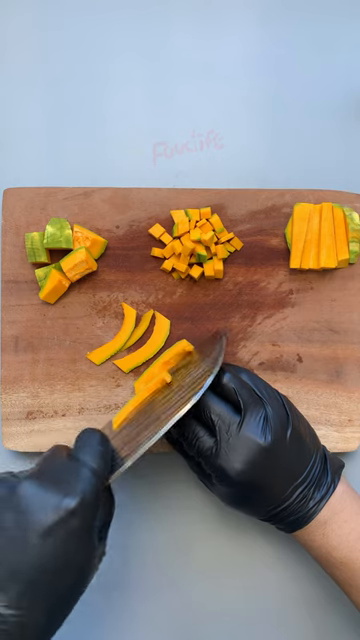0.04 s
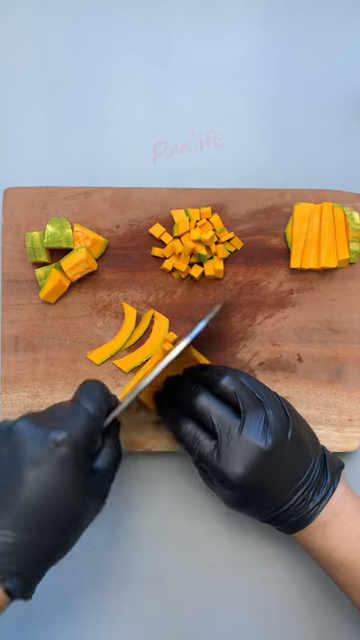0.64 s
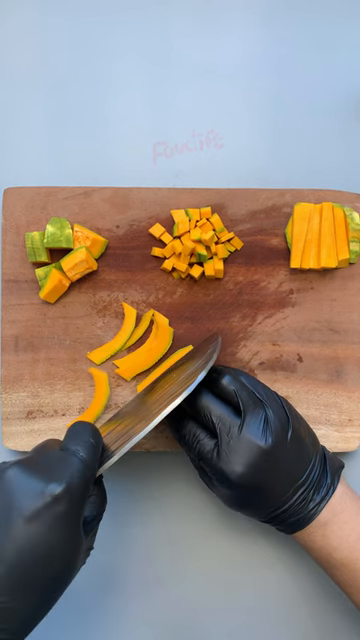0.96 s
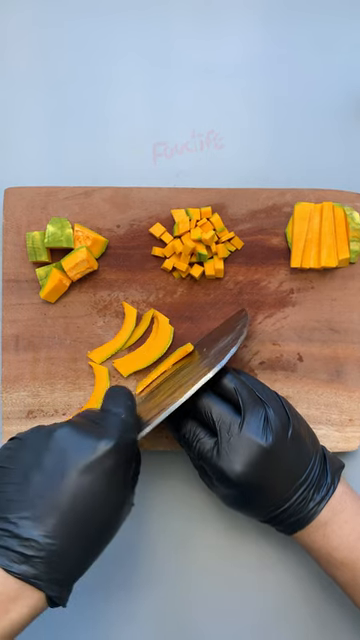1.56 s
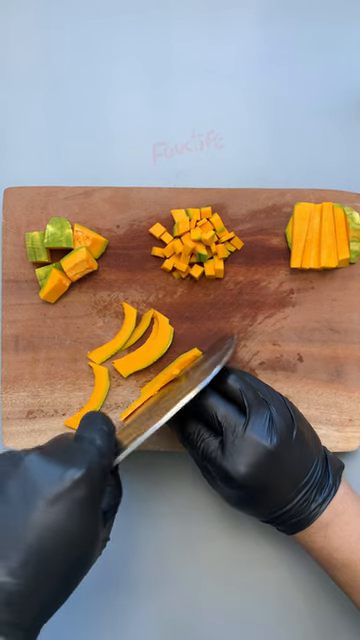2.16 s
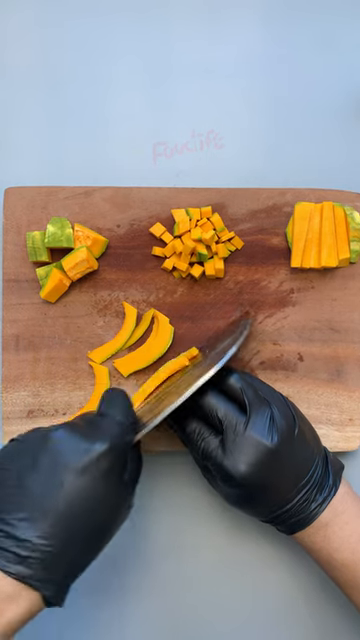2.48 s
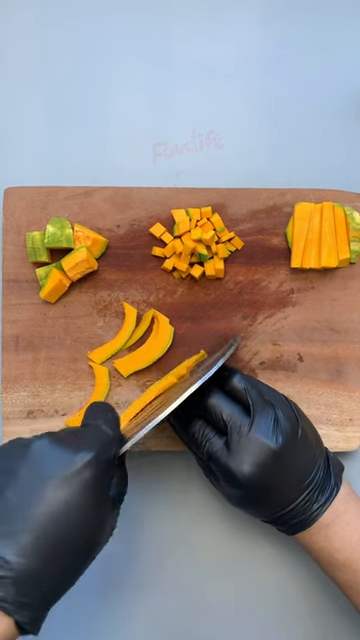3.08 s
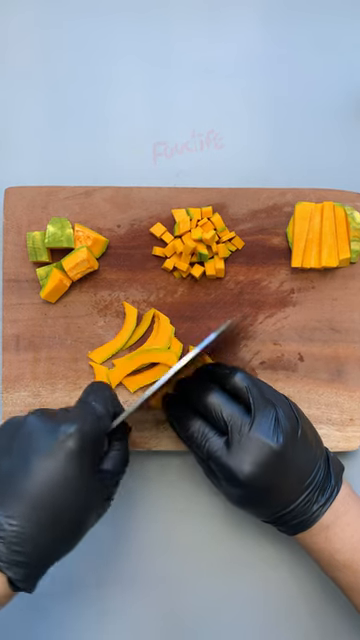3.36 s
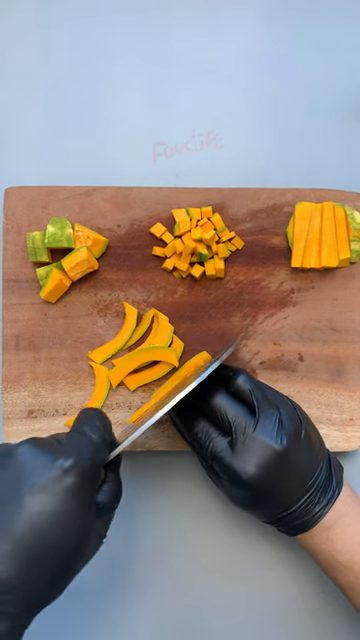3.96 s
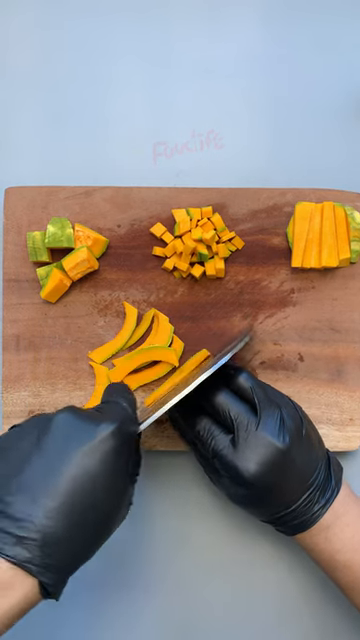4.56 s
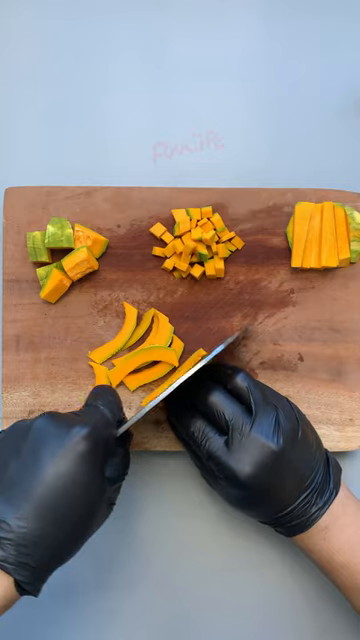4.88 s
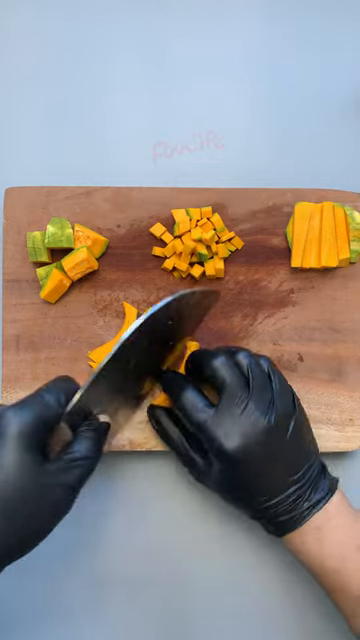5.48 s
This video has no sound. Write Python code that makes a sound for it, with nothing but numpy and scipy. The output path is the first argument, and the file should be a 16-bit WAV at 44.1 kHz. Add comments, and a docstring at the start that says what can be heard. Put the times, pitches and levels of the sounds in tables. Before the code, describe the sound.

Close by in a small kitchen, a knife cuts five slices off a firm pumpkin, about one a second. Each stroke swells into a crisp, crunchy rasp and ends in a knock on the wooden board, with a low boom from the counter. A softer, duller knock follows the last cut. In between, the blade ticks lightly and rubber gloves rub faintly over a low hum of air.

```python
"""In a small kitchen, a knife cuts five slices off a firm pumpkin on a wooden board, close by.
Each stroke pushes into the flesh, swells to a rasp of bursting cells and knocks on the board, which
makes the counter boom; then the blade is drawn along the cut. A softer knock follows the last stroke.
The blade ticks, rubber gloves rub, both squeak briefly, and the room echoes over a low hum of air."""
import sys
import numpy as np
from scipy import signal
from scipy.fft import rfft, irfft
from scipy.io import wavfile
from scipy.ndimage import uniform_filter1d

SR = 44100
rng = np.random.default_rng(int(sys.argv[2]) if len(sys.argv) > 2 else 0)


def unload_audio(sound):
    """Save the sound as a 16-bit wav file, at the path given as the first command line argument."""
    columns = np.transpose(np.atleast_2d(sound))
    # keep every value between -1 and 1, then stretch to whole-number steps
    steps = np.round(np.clip(columns, -1, 1) * 32767)
    wavfile.write(sys.argv[1], SR, steps.astype(np.int16))


N = 243873
T = np.arange(N) / SR
RING = T[:SR]  # one second of time for a struck thing to ring in

# The tones of the steel blade, damped by the hand. A ring time (t60) is the time to fade by 60 dB.
# (pitch [Hz], relative level [dB], ring time [s])
BLADE_TONES = [(1002, -4.5, 0.068), (1870, 2.5, 0.018), (2246, -4, 0.036), (2570, -6, 0.02),
               (3280, -5.5, 0.011), (3950, -11.5, 0.013)]


def slicing(crunch_db=6.0, slip_db=1.1, stop_s=0.0057):
    """Cells burst under the edge: a fine rasp, and a lower crunch from the body of the pumpkin."""
    # The blade drives down until the board stops it, then is drawn along the cut. (landing [s],
    # rasp level [dB], swell time [s], crunch share [dB], delay of the draw [s], draw level [dB])
    strokes = [(0.309, -44.5, 0.034, -8, 0.12, -61), (1.495, -43.5, 0.022, -2.5, 0.11, -66),
               (2.394, -43, .029, -4, 0.084, -63.5), (3.194, -46.5, 0.044, -4, 0.091, -65),
               (4.542, -44, 0.013, -3.5, 0.093, -62.5), (4.955, -52, 0.0061, -12, .04, -73.5)]
    # First pushes that stall before the board.
    # (peak time [s], rasp level [dB], swell time [s], fade time [s], crunch share [dB])
    pushes = [(.155, -63, 0.071, 0.12, -2.5), (1.377, -54, 0.047, 0.017, -1.5),
              (2.178, -71.5, 0.062, 0.042, -4), (2.309, -56.5, 0.035, 0.034, -1),
              (3.05, -70.5, 0.055, 0.12, 2.5)]
    # The tone colours of the rasp and the crunch. (frequency [Hz], relative level [dB])
    rasp_spectrum = [(3000, -22.5), (4400, -9), (5200, -5), (6000, 0), (7200, 2), (8500, 2.5),
                     (10000, -4.5), (12000, -4.5), (14000, -7), (15700, -14)]
    crunch_spectrum = [(300, -8.5), (750, 5), (1100, 13.5), (1450, -4.5), (1900, 5), (2300, -7),
                       (2900, -0.5), (3700, -2), (4500, -2), (6500, -18)]
    rasp = unit(colour(grains(per_s=4000, spread_db=-2), rasp_spectrum))
    crunch = undb(crunch_db) * unit(colour(grains(per_s=2600, spread_db=3.5), crunch_spectrum))
    moves = [(undb(db) * swell(at, rise_s, fall_s), share) for at, db, rise_s, fall_s, share in pushes]
    for at, db, rise_s, share, draw_s, draw_db in strokes:
        drive = undb(db) * swell(at, rise_s, stop_s, curve=1.15)
        draw = undb(draw_db) * swell(at + draw_s, rise_s=.04, fall_s=.036)
        moves += [(drive, share), (draw, -4)]  # every draw has a crunch share of -4 dB
    # overlapping moves add in power
    rasp_level = np.linalg.norm([effort for effort, _ in moves], axis=0)
    crunch_level = np.linalg.norm([effort * undb(share) for effort, share in moves], axis=0)
    stick_and_slip = undb(slip_db * wander(per_s=160))  # the fibres catch the blade and let go
    return (rasp_level * rasp + crunch_level * crunch) * stick_and_slip


def knocks(lead_in_s=.0035, settle_s=.0012, press_s=0.011):
    """Blade or hand hits the board and presses it onto the counter; a softer landing sounds duller."""
    # The blows, with relative levels. (time [s], clack [dB], boom [dB], treble cut-off [Hz],
    # clack pitch [ratio], clack length [ratio], crack [dB], boom tilt [dB per octave])
    blows = [(0.3105, -11, -4.5, 1300, 1.005, 2.47, -1.5, 0.5),
             (.436, -31.5, -32, 1510, 1.1, 1.27, -15, 1.5), (1.4983, -3, .5, 1400, 1.045, 1.38, -2, -1.5),
             (2.3953, -9, -3, 1300, 0.99, 1.3, -10, -2), (3.1944, -4.5, -1.5, 1450, 1.034, 1.63, 0.5, -1.5),
             (3.979, -46, -29.5, 200, 1, 1, -48, -4.5), (4.011, -48, -28.5, 201.5, 1.1, 1, -44, -2),
             (4.5438, -1.5, -3, 1450, 1.044, 0.97, 4, 4), (4.834, -46, -18.5, 260, 0.48, 1, -40, -0.5),
             (4.9566, -12.5, -3.5, 810, 0.83, 1.03, -28, -1)]
    # The board's short clack, and the boom of board and counter together.
    # (pitch [Hz], relative level [dB], ring time [s])
    board_tones = [(533.5, -9.5, 0.028), (784.4, 0, 0.022), (1047, 0.5, 0.0068), (1209, -8, 0.015)]
    counter_tones = [(47.8, -11.5, .6), (64.5, -17, .45), (86.6, -12.5, .45), (101.2, -2, .43),
                     (114.1, 5, 0.32), (136.8, -1, 0.38), (181.3, -2.5, .44), (197.6, -8, 0.34),
                     (235.7, -17, 0.46), (286.3, -7, 0.27), (339.8, 5, 0.16), (400.8, -6.5, 0.16),
                     (560, -9.5, 0.24), (637.5, -13, 0.39)]
    # The tone colours of cracking fibres and of jostled pieces. (frequency [Hz], relative level [dB])
    crack_spectrum = [(600, -8.5), (1500, -2.5), (2050, -5), (2700, -8.5), (4000, -22), (8000, -32),
                      (15000, -26)]
    jostle_spectrum = [(70, -5), (150, -8.5), (230, -1), (340, -0.5), (470, -2.5), (620, -3), (900, -15.5),
                       (1400, -34.5)]
    out, steel = np.zeros(N), undb(-37) * ring(BLADE_TONES)
    lead_in = lowpass(ring(board_tones, pitch=1.5), 1200, order=4)  # a faint tone just before each clack
    for at, clack_db, boom_db, cutoff_hz, pitch, length, crack_db, tilt_db in blows:
        clack = lowpass(ring(board_tones, pitch, length), cutoff_hz, order=4)
        add(out, at - lead_in_s, undb(clack_db - 16) * lead_in)
        add(out, at, undb(clack_db + .5) * clack)
        # the last fibres part just as the edge lands, and the steel rings
        burst = rng.standard_normal(SR) * np.exp(-np.abs(RING - .02) / .0018)
        add(out, at - .019, undb(crack_db - 14) * colour(burst, crack_spectrum))
        add(out, at, undb(crack_db) * steel)
        # the heavy counter builds up more slowly, and loose pieces shake differently at every blow
        boom = undb(-23.5) * ring(counter_tones, phase_step=-1.4, tilt_db=tilt_db)
        jostle = undb(-26) * unit(colour(rng.standard_normal(SR), jostle_spectrum)) * fade(t60=0.35)
        press = undb(boom_db) * (1 - np.exp(-(RING / press_s) ** 2))
        add(out, at + settle_s, lowpass(press * (boom + jostle), cutoff_hz, order=4))
    return out


def ticks():
    """The edge snaps a fibre or touches the board, and the steel rings briefly."""
    # Light touches of the blade. (time [s], relative ring level [dB], relative snap level [dB])
    touches = [(0.388, -33.5, 4), (0.418, -38, 4), (.4368, -15, 7.5), (0.987, 1.5, -1.5),
               (1.628, -24.5, -6), (3.975, -36.5, -12), (4.064, -35, -13), (5.36, -24, -4.5),
               (5.445, -28, -4), (5.468, -35, 0)]
    # The tone colour of a snapping fibre. (frequency [Hz], relative level [dB])
    snap_spectrum = [(1200, 6), (2000, -8.5), (4000, -5.5), (6500, 0.5), (9000, 0), (15000, -7)]
    out, steel = np.zeros(N), ring(BLADE_TONES)
    for at, ring_db, snap_db in touches:
        snap = unit(colour(rng.standard_normal(SR), snap_spectrum)) * fade(t60=0.0067)
        add(out, at - .001, undb(snap_db - 49) * snap)
        add(out, at, undb(ring_db - 39) * steel)
    return out


def rubbing(squeak_s=0.014):
    """Gloves and loose slices slide between the cuts, over a faint hiss and with a few short squeaks."""
    # A glove or a slice slides. (peak time [s], level [dB], swell time [s], fade time [s])
    rubs = [(.625, -82, 0.01, .015), (1.122, -75.5, .012, .015), (1.738, -75.5, 0.026, .025),
            (3.46, -69.5, 0.017, .05), (3.985, -72, 0.013, .025), (4.068, -70.5, .025, .04),
            (4.28, -76, 0.031, .025), (4.376, -65, 0.021, .016), (5.16, -78.5, .02, .04),
            (5.36, -64, 0.029, .018), (5.47, -64, 0.038, .04)]
    # A faint, high background hiss that rises, mostly in the first three seconds. (time [s], level [dB])
    hiss_levels = [(0, -100), (2.2, -92.5), (2.9, -84), (5.5, -80.5)]
    # The tone colour of the rubbing and the hiss. (frequency [Hz], relative level [dB])
    spectrum = [(1500, -6), (3000, -4), (4000, 3), (5000, 1), (6500, 0), (8500, 0.5), (10500, -7.5),
                (15000, -16.5)]
    # Short squeaks; the last, lower one is the blade drawn along the cut.
    # (time [s], pitch [Hz], level [dB])
    squeaks = [(2.111, 4460, -68), (2.17, 1825, -61.5), (2.9, 5250, -71), (4.755, 879, -51)]
    slides = [undb(db) * swell(at, rise_s, fall_s) for at, db, rise_s, fall_s in rubs]
    hiss = undb(np.interp(T, *np.transpose(hiss_levels)))
    level = np.linalg.norm(slides + [hiss], axis=0)
    noise = unit(colour(grains(per_s=3100, spread_db=2.5), spectrum))
    out = noise * level * undb(0.79 * wander(per_s=18))
    for at, hz, db in squeaks:
        shaky_hz = hz * (1 + 0.037 * wander(per_s=900))
        phase = 2 * np.pi * np.cumsum(shaky_hz) / SR
        out += undb(db) * np.exp(-((T - at) / squeak_s) ** 2) * np.sin(phase)
    return out


def room(x, build_s=0.0011):
    """Two near surfaces echo the sound, and a wash of echoes dies at its own pace in each band."""
    # The wash of echoes. (band centre [Hz], level [dB], ring time [s], left-right likeness [0-1])
    bands = [(132.06, -21.5, 0.91, .6), (272, -11.5, .34, .4), (434, -3.5, 0.44, 0.1), (724, -12, 0.27, 0),
             (1200, -13, 0.44, 0.5), (1600, -10, .42, .4), (2500, -2.5, 0.27, .1), (5040, -5, .38, .1),
             (7440, -17.5, .4, 0.6), (13000, -7, 0.23, 1)]
    # Echoes off near surfaces. (delay [s], left gain [ratio], right gain [ratio])
    echoes = [(.0044, 0.19, 0.16), (.0078, 0.12, -.08)]
    log_hz = np.log(np.fft.rfftfreq(SR, 1 / SR) + 1)
    centres = np.log([row[0] for row in bands])
    response = np.zeros((2, SR))
    for k, (_, db, t60, likeness) in enumerate(bands):
        band = np.sqrt(np.interp(log_hz, centres, np.eye(len(bands))[k]))
        noise = irfft(rfft(stereo_noise(SR, likeness)) * band, SR)
        tail = fade(t60) * (1 - np.exp(-(RING / build_s) ** 2))
        response += undb(db) * noise * tail / np.linalg.norm(tail)
    response[:, 0] += 1  # the sound that arrives directly
    for delay_s, left, right in echoes:
        response[:, int(delay_s * SR)] += left, right
    return signal.fftconvolve(x[None], response, axes=1)[:, :N]


def air(level_db=-56.5):
    """Steady room air; its bass is alike on both sides and wavers a little."""
    # The tone colour of the air's low hum. (frequency [Hz], relative level [dB])
    air_spectrum = [(28, -25), (49, -5), (110, -2), (190, -10), (300, -12.5), (344, -7), (480, -13),
                    (700, -15), (1100, -20), (1750, -23), (2700, -33), (3900, -37), (5200, -45),
                    (8500, -60.5), (15000, -75)]
    bass = lowpass(stereo_noise(N, likeness=1.0), 370, order=2) * undb(.9 * wander(per_s=15))
    noise = stereo_noise(N, likeness=0.075)
    hiss = noise - lowpass(noise, 300, order=1)
    return unit(colour(bass + hiss, air_spectrum)) * undb(level_db)


def swell(at, rise_s, fall_s, curve=1.3):
    """A hand movement gathers, peaks at time `at` and dies away; curve 1 is pointed, 2 is round."""
    return np.exp(-(np.abs(T - at) / np.where(T < at, rise_s, fall_s)) ** curve)


def ring(tones, pitch=1, length=1, phase_step=np.pi, tilt_db=0):
    """A struck thing rings with fading tones; where it is hit tilts them towards low or high."""
    hz, db, t60 = np.transpose(tones)
    gain = undb(db + tilt_db * np.log2(hz / np.median(hz)))
    return sum(gain[k] * fade(t60[k] * length) * np.sin(2 * np.pi * hz[k] * pitch * RING + k * phase_step)
               for k in range(len(hz)))


def grains(per_s, spread_db):
    """A dense shower of tiny clicks of uneven size."""
    clicks = rng.random(N) < per_s / SR
    direction, size = rng.standard_normal((2, N))
    return unit(clicks * np.sign(direction) * undb(spread_db * np.clip(size, -2, 2)))


def fade(t60):
    """A one-second curve that falls by 60 dB every t60 seconds."""
    return np.exp(-np.log(1000) * RING / t60)


def wander(per_s):
    """A smooth random drift with a spread near 1."""
    hold = int(SR / per_s)
    steps = np.repeat(rng.standard_normal(N // hold + 1), hold)
    return unit(uniform_filter1d(uniform_filter1d(steps, hold), hold)[:N])


def stereo_noise(size, likeness):
    """Left and right noise, from unrelated (likeness 0) to the same (1)."""
    mid, side = rng.standard_normal((2, size))
    return mid * np.sqrt((1 + likeness) / 2) + np.outer([1, -1], side) * np.sqrt((1 - likeness) / 2)


def colour(x, points):
    """Shape a sound's lows and highs along (Hz, dB) points, falling away beyond both ends."""
    hz, db = np.transpose(points)
    f = np.fft.rfftfreq(x.shape[-1], 1 / SR) + 1
    gain = undb(np.interp(np.log(f), np.log(hz), db))
    ends = np.minimum(f / hz[0], 1) ** 2 * np.minimum(hz[-1] / f, 1) ** 2
    return irfft(rfft(x) * gain * ends, x.shape[-1])


def lowpass(x, hz, order):
    """Turn down everything above `hz`."""
    return signal.sosfilt(signal.butter(order, hz, fs=SR, output="sos"), x)


def add(track, at, sound):
    """Mix a sound into a track, starting at `at` seconds."""
    start = int(at * SR)
    track[start:start + len(sound)] += sound[:N - start]


def undb(db):
    """Turn decibels into a gain."""
    return 10 ** (np.asarray(db) / 20)


def unit(x):
    """Scale to an average (rms) level of 1."""
    return x / np.sqrt(np.mean(x ** 2))


def scene():
    """Everything happens on the board, in one room."""
    return room(slicing() + knocks() + ticks() + rubbing()) + air()


def record(dry):
    """Two microphones hear out of step, the left gets less of the middle range, and the top is cut."""
    # How far the left microphone runs ahead of the right. (frequency [Hz], phase lead [radians])
    left_lead = [(0, 0), (900, -.55), (2000, .3), (2600, 1.4), (3900, 1.2), (4500, 1.9), (5300, 4.1),
                 (5700, 5.3), (6500, 6.2), (7300, 6.35), (8900, 8.5), (10400, 10), (11800, 12.5),
                 (12800, 12.7), (14800, 15.6), (16000, 16)]
    dip_db, top_hz = -1.5, 15600
    f = np.fft.rfftfreq(N, 1 / SR)
    middle = np.interp(f, [40, 150, 3500, 5500], [0, 1, 1, 0])
    phase_shift = np.exp(1j * np.interp(f, *np.transpose(left_lead)))
    left = irfft(rfft(dry[0]) * undb(dip_db * middle) * phase_shift, N)
    top_cut = signal.ellip(10, .2, 80, top_hz, fs=SR, output="sos")
    return signal.sosfilt(top_cut, np.array([left, dry[1]]))


dry = scene()
out = record(dry)
unload_audio(out)
```